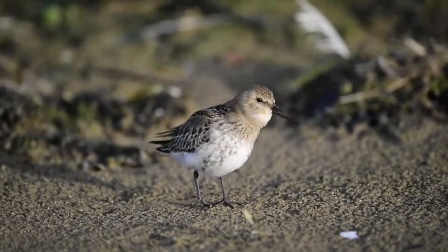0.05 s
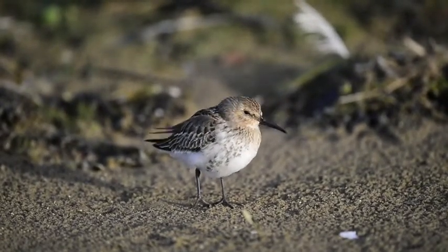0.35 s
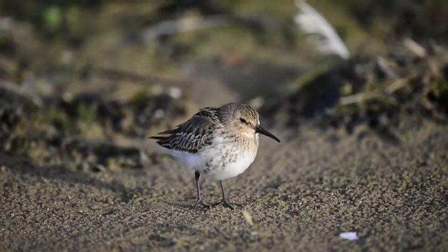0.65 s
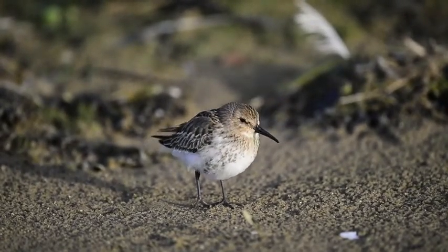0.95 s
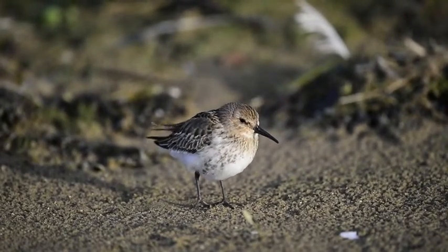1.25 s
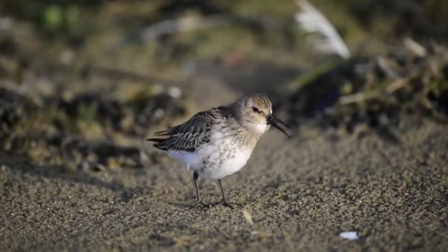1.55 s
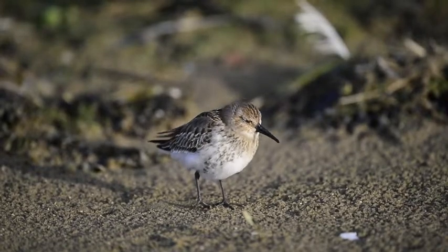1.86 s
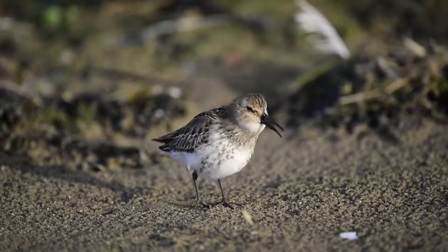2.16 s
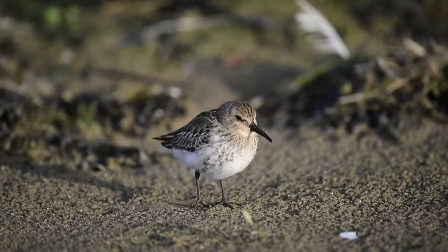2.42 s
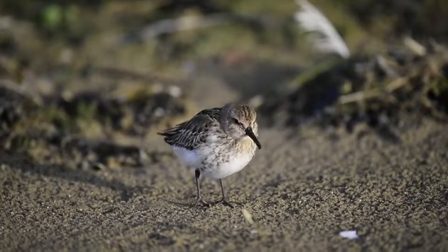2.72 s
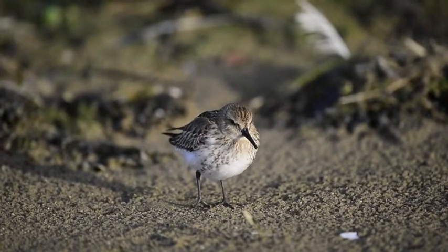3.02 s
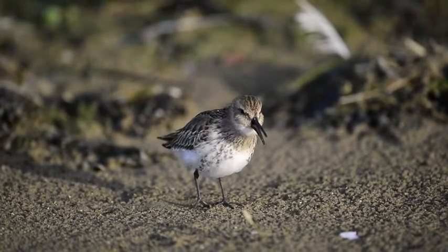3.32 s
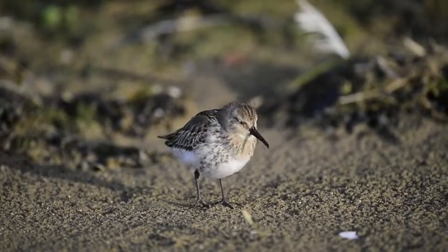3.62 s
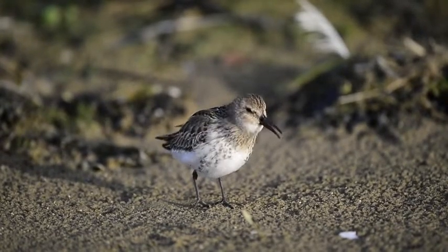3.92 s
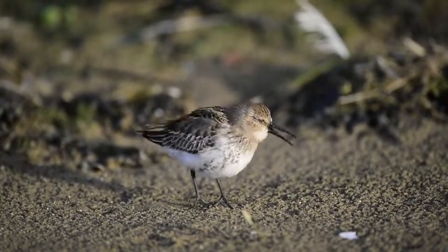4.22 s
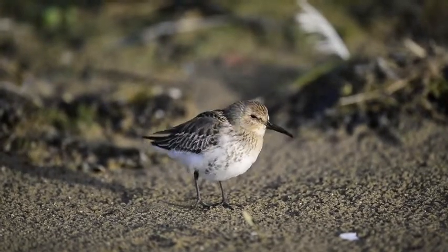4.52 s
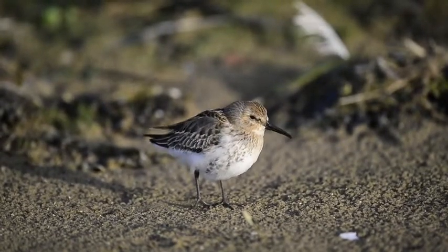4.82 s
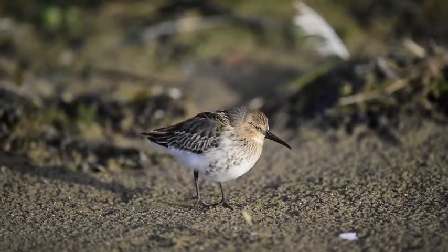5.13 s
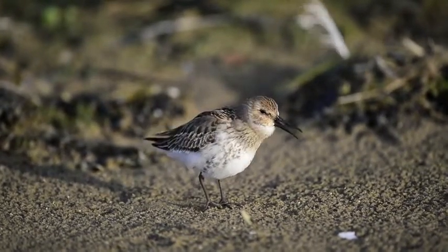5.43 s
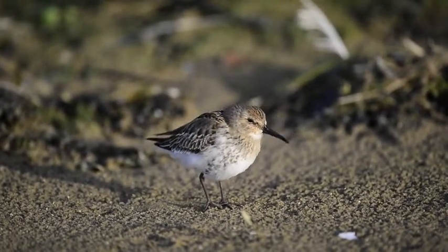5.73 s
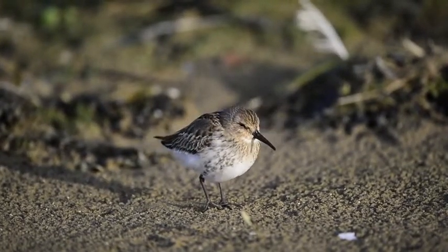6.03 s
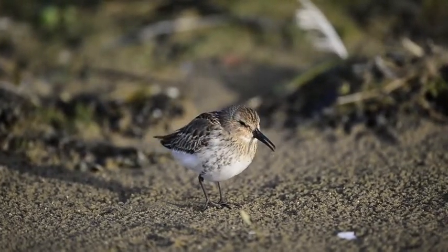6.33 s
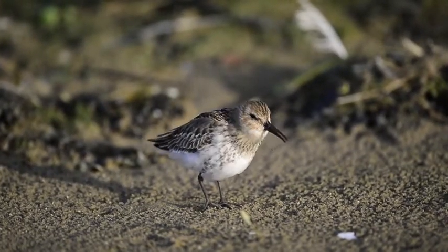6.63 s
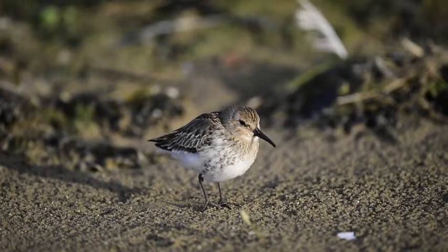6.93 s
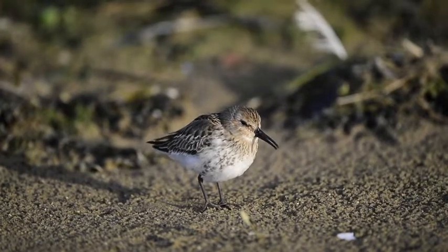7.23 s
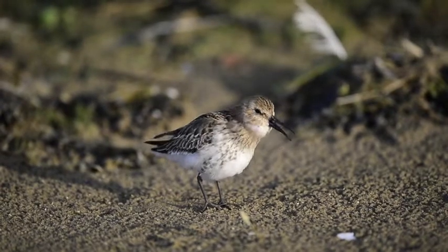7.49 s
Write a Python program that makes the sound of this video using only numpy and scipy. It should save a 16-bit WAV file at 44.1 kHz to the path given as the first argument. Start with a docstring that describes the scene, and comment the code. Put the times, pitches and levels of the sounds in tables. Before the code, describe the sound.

Uneven gusts of wind rumble and flutter on the microphone at a beach, with a few faint dry ticks and clicks.

```python
"""On a beach, gusty wind buffets a microphone. The flowing air makes a low rumble, and eddies
(little whirls of air) thump and flutter as they cross the port, the microphone's opening.
Close by, small dry ticks snap and a hard object clicks and rings a few times.
Behind them a soft wash of shore noise, a hiss and a thin electronic whine drop abruptly and
creep back together, and birds peep faintly far off."""
import sys
import numpy as np
from scipy import signal
from scipy.fft import rfft, irfft, next_fast_len
from scipy.io import wavfile
from scipy.ndimage import uniform_filter1d

SR = 44100
rng = np.random.default_rng(int(sys.argv[2]) if len(sys.argv) > 2 else 0)


def waveform_to_disk(signal):
    """Save audio, clipped to [-1, 1], as 16-bit WAV at the path in sys.argv[1]."""
    frames = np.transpose(np.atleast_2d(signal))
    scaled = np.clip(frames, -1, 1) * 32767
    samples = np.round(scaled).astype(np.int16)
    wavfile.write(sys.argv[1], SR, samples)


N = 337806
TIME = np.arange(N) / SR


# how strong the low and high parts of the rumble are: f/Hz, level/dB
RUMBLE_SPECTRUM = [(15, -16.5), (28, -12.5), (45, -4), (70, 0), (110, -1.5), (170, -8.5), (260, -14),
                   (420, -25), (700, -36), (1300, -50), (3000, -73.5)]

def rumble(wind_db, level_db=-.5, lumpy_db=3.8, lumpy_hz=25):
    """Flowing air makes slow swings of pressure whose loudness follows the wind."""
    flow = noise(RUMBLE_SPECTRUM)
    steady_flow = flow / np.sqrt(uniform_filter1d(flow ** 2, 3000) + 0.037)
    lumps = amp(lumpy_db * wander(lumpy_hz))
    return amp(wind_db + level_db) * unit_rms(steady_flow * lumps)


# gusts hitting the port: middle t/s, level/dB, length/s, swirl f/Hz, core level against the swirl/dB
GUSTS = [(0.06, -25.5, 0.017, 151, -10), (.122, -20, 0.0054, 194, -6), (0.326, -35, .028, 153, 1),
         (0.391, -28.5, 0.045, 205, 4), (.735, -32.5, 0.017, 187, -19), (0.816, -28, 0.0086, 190, -16),
         (0.935, -33, 0.016, 195, -1.5), (1.015, -33.5, 0.035, 187, 4), (1.069, -28.5, 0.01, 284, -7),
         (1.127, -37.5, 0.028, 194, 0.5), (1.163, -37.5, 0.047, 248, -17), (1.458, -30, 0.0096, 137, -27),
         (1.53, -30.5, .021, 188, -16), (1.632, -25.5, 0.0059, 115, -32), (1.687, -29, 0.011, 187, -1.5),
         (1.718, -53.5, 0.0028, 177, 1), (1.74, -28.5, 0.03, 214, -1.5), (1.828, -39, 0.0052, 224, -18),
         (1.989, -31.5, 0.036, 212, 3), (2.031, -30.5, 0.013, 160, -1), (2.055, -30, 0.0083, 173, -4),
         (2.136, -36.5, 0.019, 202, 2), (2.181, -35.5, 0.008, 180, -12), (2.25, -31, 0.014, 166, 1.5),
         (2.351, -34.5, 0.0066, 151, -15), (2.387, -28.5, 0.0067, 123, -22), (2.455, -36, 0.058, 246, 7.5),
         (2.595, -31.5, 0.026, 177, 6.5), (2.714, -37.5, 0.026, 195, 11.5), (2.803, -30.5, .02, 164, 6.5),
         (2.849, -38, 0.05, 242, 5.5), (2.964, -26, 0.017, 282, -0.5), (3.015, -34, 0.015, 211, 1.5),
         (3.133, -35.5, 0.013, 236, -18), (3.192, -36.5, 0.017, 292, -3), (3.246, -35.5, 0.035, 232, 3.5),
         (3.379, -32.5, 0.02, 223, -12), (3.415, -28, .024, 202, -5.5), (3.557, -31.5, 0.023, 215, 0),
         (3.641, -30.5, 0.0076, 132, 6), (3.669, -24, 0.0075, 192, 1), (3.914, -19.5, 0.0095, 173, -13),
         (3.961, -25.5, 0.036, 148, -1), (4.072, -28, 0.01, 119, 2), (4.098, -22, .0076, 193, -7.5),
         (4.27, -30, 0.04, 116, -19), (4.487, -28.5, 0.011, 119, -37), (4.598, -33, 0.086, 167, -22),
         (4.685, -21, 0.012, 242, -4), (4.707, -16.5, 0.011, 168, -3.5), (4.734, -33, 0.022, 232, 0),
         (4.792, -24.5, 0.0073, 210, -1), (4.922, -33.5, .036, 192, -13), (5.012, -25, 0.014, 200, -5),
         (5.102, -34, 0.017, 215, -14), (5.129, -36, .005, 252, 4.5), (5.149, -23, 0.024, 225, -4),
         (5.211, -21, 0.0042, 130, -10.5), (5.374, -31.5, 0.0089, 151, -21),
         (5.647, -26.5, 0.012, 142, -12), (5.721, -35, 0.042, 119, -35), (5.966, -20, 0.016, 99, -4.5),
         (6.06, -28, 0.011, 185, -9), (6.165, -32, 0.079, 110, 0), (6.228, -30.5, 0.025, 116, -8),
         (6.309, -29.5, 0.0068, 177, 6.5), (6.642, -18.5, 0.0042, 114, -26),
         (6.964, -25.5, .0058, 163, -11), (7.004, -31.5, .018, 210, 2), (7.052, -28, 0.005, 217, -2),
         (7.13, -35.5, 0.022, 172, -25), (7.272, -33.5, 0.007, 210, -32), (7.329, -29.5, .025, 111, -53)]

def buffets(core_s=.003, core_ratio=1.405, size=4096):
    """Each gust thumps: a slow swirl of air with a brief, faster core at its middle."""
    out = np.zeros(N)
    t = (np.arange(size) - size // 2) / SR
    for s, db, length, peak_hz, core_db in GUSTS:
        swirl = eddy(t, length, peak_hz)
        core = amp(core_db) * eddy(t, core_s, core_ratio * peak_hz)
        add(out, s + t[0], amp(db) * (swirl + core))
    return out


def eddy(t, length, peak_hz, rise=0.38, fall=0.45, steadiness=0.79, sputter_db=6.5, sputter_hz=150):
    """One whirl of air crosses the port around t = 0 in a short, sputtering burst of pressure swings."""
    swirl = unit_rms(eddy_tone(rng.standard_normal(len(t)), peak_hz))
    power = uniform_filter1d(abs(signal.hilbert(swirl)) ** 2, size=130)
    swirl = unit_rms(swirl / (power + .05) ** (steadiness / 2))  # makes the swings alike in size
    sputter = amp(sputter_db * wander(sputter_hz, len(t)))
    width_s = length * np.where(t < 0, rise, fall)
    fade = np.exp(-.5 * (t / width_s) ** 2)
    return unit_rms(swirl * sputter * fade) * np.sqrt(np.mean(fade ** 2))


def eddy_tone(x, peak_hz):
    """Gives x the dull tone of an eddy's smooth push; a faster eddy has a higher peak_hz."""
    return colour(x, lambda f: f / peak_hz * np.exp(-f / peak_hz))


# the breeze, strongest just past the middle: t/s, level/dB
BREEZE = [(0, -30.5), (.08, -30.5), (.2, -33), (.55, -39), (.75, -35), (1.0, -38), (1.4, -39.5), (2.1, -38),
          (2.45, -38), (3.5, -38.5), (4.0, -29), (4.4, -34.5), (4.95, -35.5), (5.4, -37), (5.9, -36),
          (6.2, -35), (6.42, -36), (7.66, -38.5)]

def wind_strength(push_db=-4.0, push_s=0.024, ref_s=0.019, ref_hz=150, size=12000):
    """The breeze plus a brief push from every gust, in dB; long, slow gusts push hardest."""
    power = amp(curve(BREEZE)) ** 2
    t = (np.arange(size) - size // 2) / SR
    for s, db, length, peak_hz, _ in GUSTS:
        push = amp(db + push_db + 4 * np.log2(ref_hz / peak_hz))  # 4 dB more for each octave lower
        add(power, s + t[0], push ** 2 * length / ref_s * np.exp(-(t / push_s) ** 2))
    return 10 * np.log10(power)


def flutter(extra_wind_db, level_db=-46.0, follow=0.86, fast_db=-11, slow_swing_db=9.5, fast_swing_db=7):
    """Countless small eddies come in bursts; the faster ones sound brighter and quieter."""
    speed = np.minimum(wander(hz=50), 2)
    slow = eddy_tone(rng.standard_normal(N) * amp(slow_swing_db * speed), peak_hz=110)
    fast = eddy_tone(rng.standard_normal(N) * amp(fast_swing_db * speed), peak_hz=210)
    return amp(level_db + follow * extra_wind_db) * (unit_rms(slow) + amp(fast_db) * unit_rms(fast))


def flaps(extra_wind_db, level_db=-51.5, follow=.7, per_s=40, crowding=0.4, spread_db=3.0):
    """Single small eddies snap across the port at random, harder and more often in stronger wind."""
    strength = amp(spread_db * np.minimum(rng.exponential(1, N), 3))
    direction = rng.choice([-1, 1], N)
    hits = rng.random(N) < per_s * amp(crowding * extra_wind_db) / SR
    snaps = eddy_tone(strength * direction * hits, peak_hz=230)
    return amp(level_db + follow * extra_wind_db) * unit_rms(snaps)


# how well the port lets each frequency through: f/Hz, level/dB
PORT_RESPONSE = [(20, -25), (60, -35), (130, 3.5), (300, 0.5), (600, -0.5), (1100, 0.5), (1700, 1.5),
                 (2600, 4.5), (5000, -38), (9000, -60)]

def port(pressure):
    """The opening passes the eddies' pressure but holds back deep bass and high treble."""
    return shape(pressure, PORT_RESPONSE)


# dry ticks: t/s, level/dB, centre f/Hz
DRY_TICKS = [(0.071, -37.5, 6340), (0.8835, -24.5, 7700), (1.0774, -27.5, 7400), (2.081, -49, 6400),
             (2.384, -48.5, 6500), (2.44, -47, 6900), (2.781, -44, 7500), (2.8047, -16, 7700),
             (2.8254, -24, 8200), (2.8498, -21, 7450), (2.921, -43, 7750), (2.9342, -44, 6050),
             (3.402, -41.5, 7840), (3.623, -32, 6600), (3.738, -34.5, 6270), (4.583, -38.5, 6130),
             (4.956, -47, 6100), (5.013, -38.5, 5330), (6.603, -32.5, 7040), (6.819, -42, 6960),
             (6.8252, -45, 5470), (6.8461, -28.5, 6800), (6.935, -44.5, 6400)]
# the tone that all ticks share: f/Hz, level/dB
TICK_SPECTRUM = [(500, -28), (2000, 1.5), (3300, -1.5), (4200, 4.5), (5500, 0.5), (7000, 3), (9200, 1),
                 (10300, -7.5), (12500, -19), (15000, -13)]

def ticks(crack_db=7, decay_s=0.00059, tail_db=-30, tail_s=.003, spread=1.22,
          knock_hz=4300, knock_db=-25, knock_s=0.0011):
    """Each tiny snap is a sharp crack and its crumbling, heard in one broad band, plus a faint knock."""
    out = np.zeros(N)
    t = np.arange(1024) / SR
    crack = amp(crack_db) * (t == 0)
    fade = np.exp(-t / decay_s) + amp(tail_db) * np.exp(-t / tail_s)
    knock = amp(knock_db) * np.exp(-t / knock_s) * np.sin(2 * np.pi * knock_hz * t)
    for s, db, hz in DRY_TICKS:
        crumble = rng.standard_normal(len(t)) * fade
        band = signal.butter(1, [hz / spread, hz * spread], "band", fs=SR, output="sos")
        tick = signal.sosfilt(band, crack + crumble)
        add(out, s, amp(db) * (tick / abs(tick).max() + knock))
    return shape(out, TICK_SPECTRUM)


# knocks on one small hard object: t/s, peak level/dB, treble lift/(dB per octave)
KNOCKS = [(0.614, -31.5, 7), (1.6583, -36.5, 7.5), (2.6169, -37.5, 8.5), (6.3698, -28.5, 9),
          (6.3723, -56, 15)]
# the tones it rings with: f/Hz, level/dB, time to fade by 60 dB/s
RING_TONES = [(2930, -5.5, 0.026), (3675, -2, 0.0058), (3793, 1.5, 0.014), (4800, -6, 0.0087),
              (5800, -34, 0.01), (6640, -9.5, 0.0092), (7150, -9, 0.0069), (9330, -12, 0.0051),
              (10000, -12.5, 0.01), (12600, -28, 0.0071)]

def clicks(rise_s=0.0001):
    """Light knocks make a small hard object ring briefly with all its tones at once."""
    out = np.zeros(N)
    t = np.arange(4096) / SR
    for s, db, lift_db in KNOCKS:
        ring = np.zeros(len(t))
        for hz, tone_db, fade_s in RING_TONES:
            fade = amp(tone_db + lift_db * np.log2(hz) - 60 * t / fade_s)
            ring += fade * np.sin(2 * np.pi * (hz * t + rng.random()))
        ring *= 1 - np.exp(-t / rise_s)
        add(out, s, amp(db) * ring / abs(ring).max())
    return out


# the tone of the distant shore: f/Hz, level/dB
WASH_SPECTRUM = [(40, -28), (150, 0.5), (400, 13.5), (800, 10.5), (1400, 8.5), (2500, 1.5), (4000, -4.5),
                 (6500, -12.5), (10000, -14), (16000, -35)]
# how the wash drifts louder and softer against the hiss: t/s, level/dB
WASH_DRIFT = [(0, -1), (.3, -3), (1.05, 0.5), (1.4, -2), (2, 1.5), (2.6, -2), (3.1, 1), (4.2, 3.5),
              (5.5, -4), (6.7, -.5), (7.66, -5)]

def shore_wash(gain_db=15):
    """The distant shore makes a soft, slowly drifting rush of noise."""
    return amp(gain_db + curve(WASH_DRIFT)) * noise(WASH_SPECTRUM)


# the tone of the hiss, with a narrow bump near 5500 Hz: f/Hz, level/dB
HISS_SPECTRUM = [(1000, 6.5), (4900, -4.5), (5250, 14.5), (5380, 17.5), (5510, 24), (5700, 5.5), (7200, 8),
                 (7800, 10), (8400, 7), (9600, 2.5), (11500, 1), (15700, -0.5), (16000, -31)]

def hiss(gain_db=-0.5):
    """A bright, even noise."""
    return amp(gain_db) * noise(HISS_SPECTRUM)


def whine(hz=15631, gain_db=-3):
    """A thin electronic whine: one very high, pure tone."""
    return amp(gain_db) * unit_rms(np.sin(2 * np.pi * hz * TIME))


# slow rise and fall of the background: t/s, level/dB
BACKGROUND_SWELL = [(0, -68.5), (.45, -72.5), (.74, -71), (1.15, -78.5), (1.7, -73.5), (2.25, -78.5),
                    (2.77, -73.5), (3.0, -78), (3.5, -80.5), (3.8, -71), (4.35, -70), (4.9, -71.5),
                    (5.6, -71), (5.93, -63.5), (6.25, -60.5), (7.1, -77), (7.5, -66.5), (7.66, -68.5)]
# sudden drops of the background: lowest point t/s, depth/dB
BACKGROUND_DIPS = [(.211, 5.5), (.487, 3), (.785, 5), (.997, 6), (1.869, 2.5), (2.194, 3), (2.694, 1.5),
                   (4.018, 4), (4.437, 10.5), (4.733, 7.5), (5.305, 3), (5.541, 4), (5.684, 3),
                   (6.025, 17.5), (6.275, 13.5), (6.402, 11), (6.818, 1.5), (7.599, 7.5)]

def background(fall_s=0.028, recover_s=0.14, waver_db=1.17, waver_hz=28):
    """Wash, hiss and whine swell, waver, drop abruptly and creep back, all together."""
    dip_db = np.zeros(N)
    t = TIME[:SR]
    dip = np.minimum(t / fall_s, np.exp((fall_s - t) / recover_s))
    for s, depth_db in BACKGROUND_DIPS:
        add(dip_db, s - fall_s, depth_db * dip)
    level = amp(curve(BACKGROUND_SWELL) - dip_db + waver_db * wander(waver_hz))
    return level * (shore_wash() + hiss() + whine())


# bird calls: t/s, length/s, f/Hz, level/dB
BIRD_PEEPS = [(1.41, .16, 3260, -75), (1.41, .13, 4420, -79), (1.58, .08, 3280, -75)]

def birds(waver=0.01):
    """Birds far along the shore give thin, nearly pure whistles that swell and fade."""
    out = np.zeros(N)
    for s, length, hz, db in BIRD_PEEPS:
        t = np.arange(0, length, 1 / SR)
        drift = unit_rms(uniform_filter1d(rng.standard_normal(SR), size=400))[:len(t)]
        cycles = np.cumsum(hz * (1 + waver * drift)) / SR
        add(out, s, amp(db) * np.sin(np.pi * t / length) * np.sin(2 * np.pi * cycles))
    return out


def amp(db):
    """Turns decibels into a number to multiply by."""
    return 10 ** (np.asarray(db) / 20)


def unit_rms(x):
    """Scales x so that its typical size (rms) is 1."""
    return x / np.sqrt(np.mean(x ** 2) + 1e-30)


def curve(points):
    """Joins (time, level) points with straight lines across the whole scene."""
    return np.interp(TIME, *np.transpose(points))


def colour(x, gain):
    """Turns each frequency f in x up or down by gain(f)."""
    size = next_fast_len(len(x))
    return irfft(rfft(x, size) * gain(np.fft.rfftfreq(size, 1 / SR)), size)[:len(x)]


def shape(x, spectrum):
    """Filters x by a table of (frequency, level) points."""
    hz, db = np.transpose(spectrum)
    return colour(x, lambda f: amp(np.interp(np.log(f + 1), np.log(hz + 1), db)))


def noise(spectrum):
    """Noise of typical size 1 with the tone that the table gives."""
    return unit_rms(shape(rng.standard_normal(N), spectrum))


def wander(hz, size=N):
    """A smooth random wobble of typical size 1 that moves up to about hz times a second."""
    return unit_rms(colour(rng.standard_normal(size), lambda f: np.exp(-(f / hz) ** 2)))


def add(mix, s, sound):
    """Adds a sound into the mix, starting at s seconds."""
    start = round(s * SR)
    sound = sound[max(-start, 0):]
    part = mix[max(start, 0):][:len(sound)]
    part += sound[:len(part)]


def scene():
    """Wind on the microphone over the quiet beach, in one channel."""
    wind_db = wind_strength()
    extra_wind_db = wind_db - wind_db.mean()
    eddies = port(flutter(extra_wind_db) + buffets() + flaps(extra_wind_db))
    beach = background() + ticks() + clicks() + birds()
    return (rumble(wind_db) + eddies + beach)[None]


def record(dry):
    """The recorder cuts off the highest treble."""
    low_pass = signal.firwin(511, cutoff=16300, window=("kaiser", 9), fs=SR)
    return signal.oaconvolve(dry, low_pass[None], "same")


dry = scene()
out = record(dry)
waveform_to_disk(out)
```